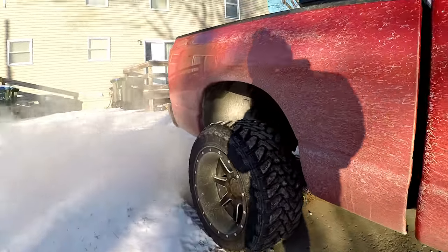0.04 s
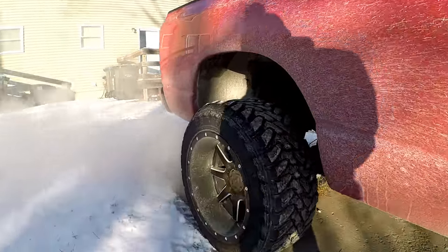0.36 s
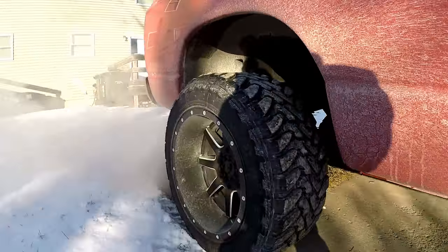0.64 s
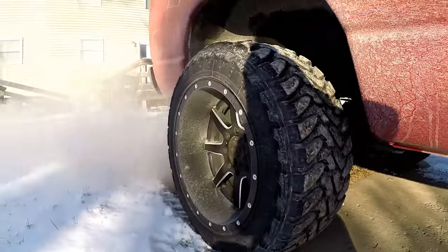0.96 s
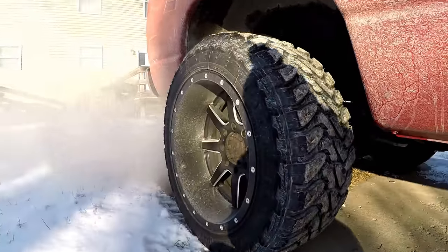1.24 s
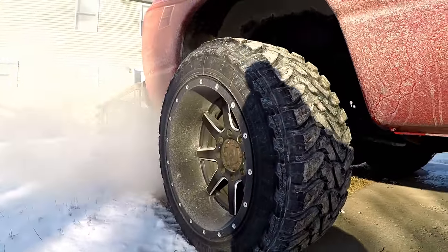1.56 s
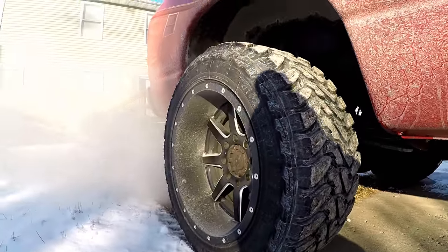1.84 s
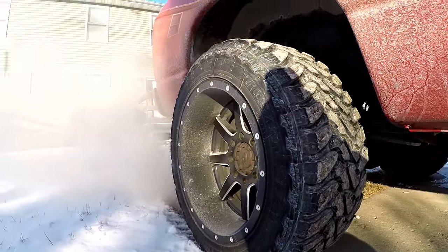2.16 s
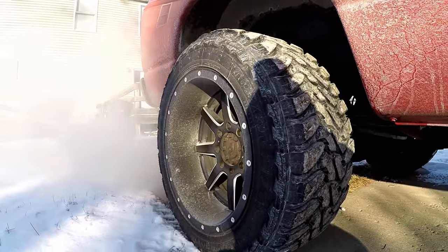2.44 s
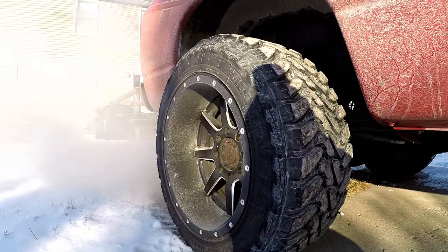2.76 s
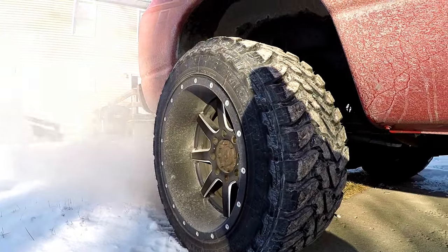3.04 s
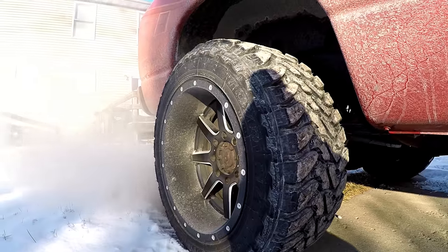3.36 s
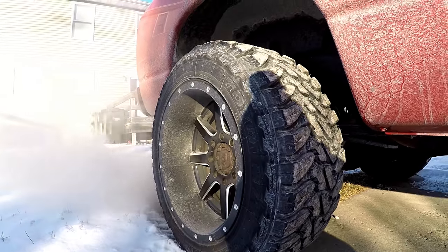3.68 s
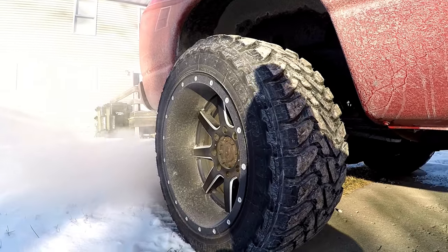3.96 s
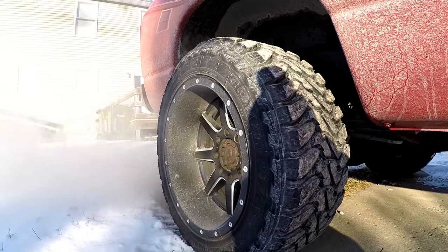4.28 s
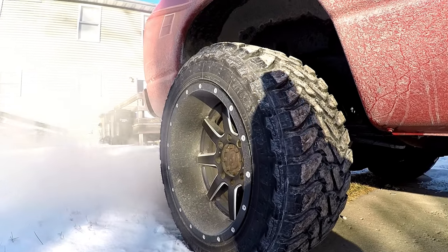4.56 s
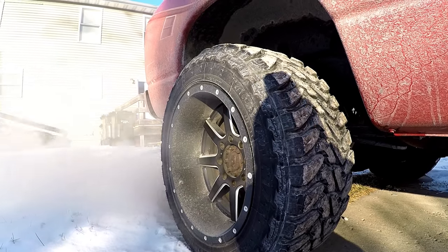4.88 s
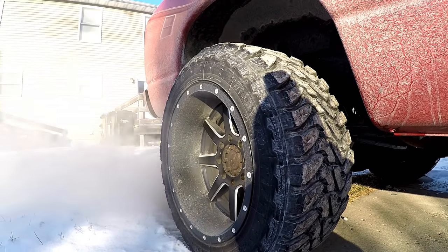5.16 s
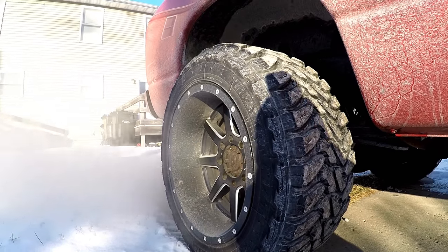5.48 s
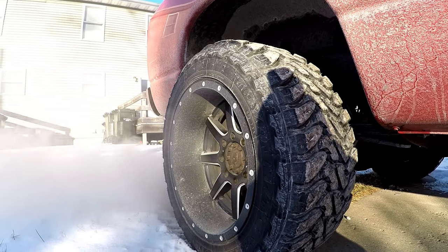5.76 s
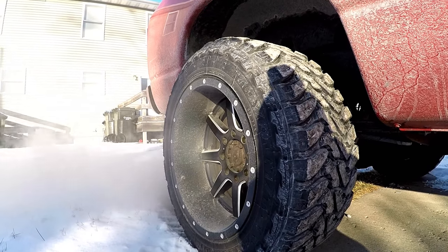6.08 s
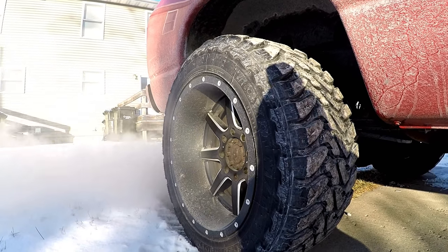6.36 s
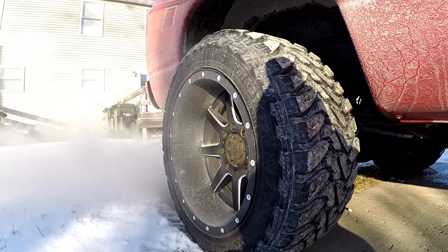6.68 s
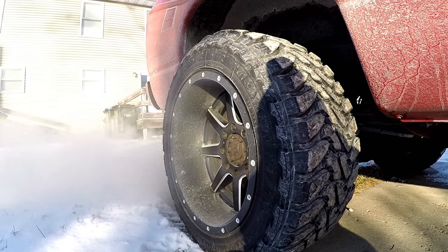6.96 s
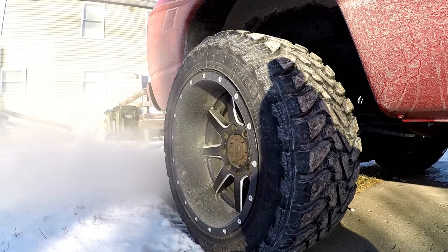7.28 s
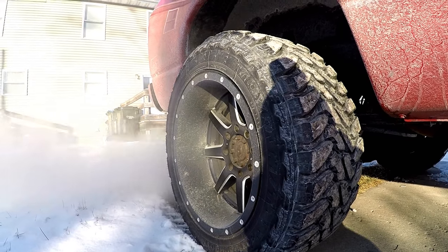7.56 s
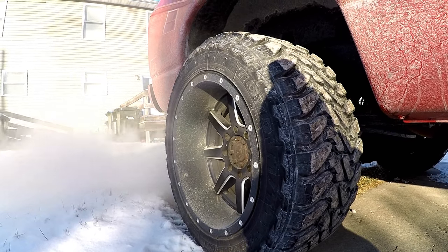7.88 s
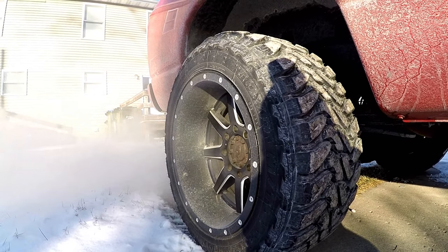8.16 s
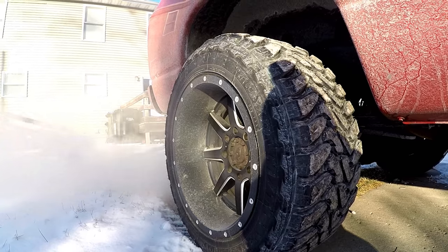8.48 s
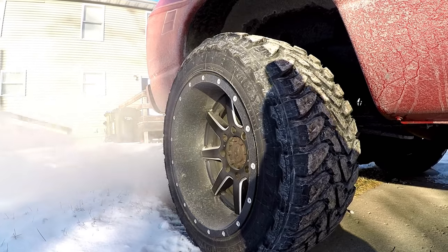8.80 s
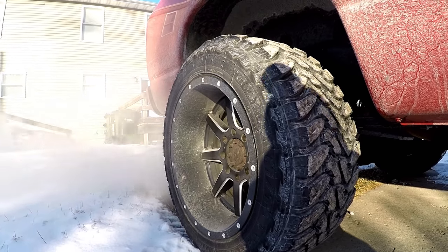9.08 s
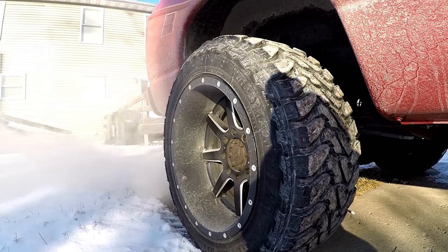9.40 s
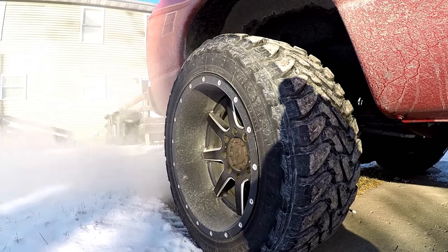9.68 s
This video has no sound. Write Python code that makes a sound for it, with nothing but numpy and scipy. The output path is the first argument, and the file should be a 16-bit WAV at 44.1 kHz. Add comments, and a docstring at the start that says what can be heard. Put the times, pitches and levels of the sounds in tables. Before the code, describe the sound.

A cold turbo diesel pickup idles close by, a deep steady exhaust drone with thuds, small coughs, engine clatter and hiss.

```python
"""A deep, steady drone with thuds, barks and rasp: a cold six-cylinder turbo diesel idling in a driveway,
heard close beside the tailpipe. Fifty firings a second drive the drone, and the uneven cylinders ring
the pipe, the hardest as coughs. Above it, ticking engine parts clatter and escaping gas hisses.
At first the tone shifts as the microphone is lowered beside the wheel, and two tiny snaps sound."""
import sys
import numpy as np
from scipy import signal
from scipy.fft import rfft, irfft
from scipy.io import wavfile
from scipy.ndimage import uniform_filter1d

SR = 44100
rng = np.random.default_rng(int(sys.argv[2]) if len(sys.argv) > 2 else 0)


def wrap_up_sound(samples):
    """Save the sound to the file named by the first command line argument, as 16-bit audio."""
    columns = np.atleast_2d(samples).T
    # keep every value between -1 and 1, then stretch to whole-number steps
    tamed = np.clip(columns, -1, 1)
    steps = np.round(tamed * 32767).astype(np.int16)
    wavfile.write(sys.argv[1], SR, steps)


N = 438354
TIME = np.arange(N) / SR
BINS = np.fft.rfftfreq(8192, 1 / SR)

# each cylinder's voice, in firing order: (thud pitch [Hz], thud level [dB], thud lag [firings], thud swell [s],
# bark level [dB], bark lag [firings], bark scatter [dB], unused level [dB], knock level [dB], knock lag
# [firings], which the rasp also reads as its gust level [dB])
CYLINDERS = [(347, 5.5, 0.202, 0.0035, -34, 0.372, 0.5, 1, -29.5, .13),
             (330, -5.5, 0.322, 0.0089, -24.5, 0.513, 2.5, 1, -30, 0.1936),
             (363, 4.5, 0.373, 0.0049, -26, 0.5106, 2.5, 0, -42.5, .2),
             (285, 3.5, 0.13, 0.0036, -24, 0.398, -0.5, 0, -30, 0.199),
             (370.3, 1.2, 0.483, 0.0047, -21, 0.5264, 3.5, 0, -34.5, .13),
             (392, 4.5, 0.296, 0.0023, -31, 0.531, 0, 0, -32.5, 0.135)]
# the drifting idle: (time [s], speed [firings/s])
IDLE = [(0.0, 50.453), (1.05, 50.014), (1.27, 50.364), (1.36, 50.052), (3.45, 50.006), (5.78, 50.085),
        (6.33, 49.755), (6.6, 50.407), (7.41, 49.794), (7.82, 49.935), (8.53, 50.25), (8.78, 49.789),
        (9.4, 50.298), (9.94, 49.783)]


def amp(db):
    """Decibels to gain."""
    return 10 ** (np.asarray(db) / 20)


def unit(x):
    """Scales to rms 1."""
    return x / np.sqrt(np.mean(x ** 2) + 1e-20)


def curves(rows):
    """Turns each column of a time table into an automation curve."""
    times, *columns = np.transpose(rows)
    return [np.interp(TIME, times, column) for column in columns]


def add(mix, time, sound):
    """Mixes a sound in, centred on a time in seconds."""
    at = round(time * SR) - len(sound) // 2 + np.arange(len(sound))
    inside = (at >= 0) & (at < N)
    mix[at[inside]] += sound[inside]


def wander(rate_hz):
    """Smooth random drift of rms 1, rolling off above the given rate."""
    hz = np.fft.rfftfreq(N, 1 / SR)
    return unit(irfft(rfft(rng.standard_normal(N)) * np.exp(-(hz / rate_hz) ** 2), N))


def resonate(x, gain):
    """Minimum-phase EQ, a gain per bin, so each resonance rings after its cause; the result has rms 1."""
    log_gain = np.log(gain + 1e-5)
    mirrored = np.r_[log_gain, log_gain[-2:0:-1]]
    taps = np.fft.ifft(np.exp(np.conj(signal.hilbert(mirrored)))).real
    return unit(signal.oaconvolve(x, taps)[:N])


def metal_colour(x, spectrum, ripple_db):
    """A broad tone curve with the metal's rings on top; ripple stands for many small, close modes."""
    # narrow rings and hollows of the metalwork: (frequency [Hz], width [Hz], lift [dB])
    rings = [(700, 22, 0), (1570, 60, -0.5), (2040, 59, -2), (2170, 44, 4.5), (2360, 38, 5),
             (2450, 37, 2.5), (2670, 29, 4), (2850, 150, -1), (3540, 31, 3.5), (3960, 80, -1.5),
             (4410, 140, 4.5), (4500, 25, 2.5), (4870, 41, 3.5), (4760, 50, 3.5), (5860, 30, 1.5)]
    points_hz, points_db = np.transpose(spectrum)
    broad_db = np.interp(np.log(BINS + 1), np.log(points_hz), points_db)
    rings_db = sum(lift * np.exp(-((BINS - hz) / width) ** 2) for hz, width, lift in rings)
    ripple = unit(uniform_filter1d(rng.standard_normal(len(BINS)), size=8))
    return resonate(x, amp(broad_db + rings_db + ripple_db * ripple))


def crank_angle(start_firings=.3845, hunt_hz=1.11, hunt_firings_per_s=.205, crest_s=-.022):
    """Crank angle in firings: the governor hunts evenly around the drifting idle speed."""
    speed = curves(IDLE)[0] + hunt_firings_per_s * np.cos(2 * np.pi * hunt_hz * (TIME - crest_s))
    return start_firings + np.cumsum(speed) / SR


def drone(crank, waver=0.046, firing_lag=0.24, bank_lag=0.5183, low_cut_lead_rad=1.54):
    """A pulse at every firing, a swing between the two manifold halves, and weak partials between."""
    # engine orders: (frequency [multiples of the six-firing cycle], level [dB])
    partials = [(3, -62), (4, -50), (5, -49), (6, -12.5), (7, -47), (9, -36), (10, -45.5), (11, -43.5),
                (12, -24.5), (13, -59.5), (14, -53), (15, -33.5), (16, -57), (18, -36.5), (20, -40.5),
                (21, -39.5), (22, -44.5), (24, -30), (25, -38), (27, -48.5), (28, -42), (29, -50.5),
                (33, -41.5), (53, -48), (54, -47), (68, -43.5), (89, -51.5), (90, -52), (95, -51),
                (113, -49.5), (116, -50), (132, -52), (134, -55.5)]
    count = len(CYLINDERS)
    out = np.zeros(N)
    unsteady = 1 + waver * wander(23)
    for (order, db), chance in zip(partials, rng.random(len(partials))):
        lag = {0: firing_lag, count // 2: bank_lag}.get(order % count, count * chance)
        # the microphone's low cut advances the firing tone
        phase = 2 * np.pi * order * (crank - lag) / count + low_cut_lead_rad * (order == count)
        out += amp(db) * np.cos(phase) * (unsteady if order > 2 * count else 1)
    return np.sqrt(2) * out


def puff(hz, swell_s, linger=1):
    """A pressure wave swells in one pipe resonance and takes linger times as long to die."""
    t = np.arange(-SR // 40, SR // 40) / SR
    envelope = np.exp(-(t / np.where(t < 0, swell_s, swell_s * linger)) ** 2)
    return -envelope * np.cos(2 * np.pi * hz * t)


def blowdowns(crank, bark_lift_db, thud_db=-28.5, thud_detune=.008, thud_jitter_s=.00005,
              echo_s=.00976, echo_gain=.3, bark_hz=557, bark_detune=.009, jitter_s=.00012,
              knock_scatter_db=2.0, cough_thud_db=2.0, crack_db=-17):
    """Each opening exhaust valve sends a knock, a thud and a bark down the pipe; hard firings cough."""
    # the hardest firings, standing out of the idle: (time [s], level [dB])
    coughs = [(0.082, -17), (0.161, -18), (0.201, -15.5), (0.32, -19), (0.4, -17.5), (0.44, -18),
              (0.52, -20), (0.559, -19), (0.64, -19), (0.679, -18), (0.919, -17), (1.159, -19.5),
              (1.278, -16.5), (1.358, -17), (1.399, -18), (1.715, -18.5), (1.878, -19), (1.995, -21),
              (2.117, -22), (2.357, -17), (2.597, -19.5), (2.716, -18), (2.836, -20), (2.957, -17.5),
              (3.077, -18.5), (3.157, -19), (3.197, -16.5), (3.275, -18.5), (3.395, -21), (3.676, -17.5),
              (4.273, -18), (4.395, -15.5), (4.996, -17.5), (5.074, -18), (5.116, -18), (5.193, -21),
              (5.594, -16.5), (5.956, -16.5), (6.275, -17), (7.03, -20.5), (7.63, -20), (7.952, -17),
              (8.073, -17.5), (8.31, -20), (8.354, -19), (8.473, -18), (8.834, -17.5), (9.272, -17.5),
              (9.312, -16.5), (9.792, -18.5)]
    cough_s, cough_db = np.transpose(coughs)
    thuds, knocks_and_barks = np.zeros((2, N))
    firings = np.arange(int(crank[-1]) + 1)
    starts = np.interp(firings, np.r_[0, crank], np.r_[-crank[0] / IDLE[0][1], TIME])
    period = np.mean(np.diff(starts))
    for firing, start, luck in zip(firings, starts, rng.standard_normal((len(starts), 8))):
        (thud_hz, size_db, thud_lag, swell_s, bark_db, bark_lag, scatter_db, _,
         knock_db, knock_lag) = CYLINDERS[firing % len(CYLINDERS)]
        hard = abs(cough_s - start - period / 2) < period / 2

        knock = amp(knock_db + knock_scatter_db * luck[6]) * puff(hz=900, swell_s=.0013)
        add(knocks_and_barks, start + knock_lag * period + jitter_s * luck[7], knock)

        thud_gain = amp(thud_db + size_db + luck[0] + cough_thud_db * hard.any())
        thud = thud_gain * puff(thud_hz * (1 + thud_detune * luck[1]), swell_s, linger=1.37)
        thud_s = start + thud_lag * period + thud_jitter_s * luck[2]
        add(thuds, thud_s, thud)
        add(thuds, thud_s + echo_s, echo_gain * thud)  # back from the far end of the pipe

        pitch = bark_hz * (1 + bark_detune * luck[3])  # the pipe's main resonance
        if hard.any():  # a cough also excites the next resonance up
            crack = amp(crack_db) * puff(hz=760, swell_s=.0041)
            bark = amp(cough_db[hard][0]) * (puff(pitch, swell_s=.0069) + crack)
        else:
            lift_db = bark_lift_db[max(int(start * SR), 0)]
            bark = amp(bark_db + scatter_db * luck[4] + lift_db) * puff(pitch, swell_s=.0067)
        add(knocks_and_barks, start + bark_lag * period + jitter_s * luck[5], bark)
    return thuds, knocks_and_barks


def pipe_notch(x, hz=616, width_hz=24):
    """The pipe cancels a narrow band just above its main resonance, hollowing out the barks."""
    return signal.lfilter(*signal.iirnotch(hz, hz / width_hz, fs=SR), x)


def rasp(crank, level_db=-32.0, locked=0.38, lag_firings=0.084, decay_firings=0.093, floor=0.83):
    """Turbulent gusts ring the pipe; the locked share of their grain repeats every engine cycle."""
    # tailpipe resonances: (frequency [Hz], half width [Hz], relative level [dB])
    pipe_modes = [(208, 22, -4), (235, 20, 3.5), (317, 22, 5), (386.7, 28, 8), (427, 25, -0.5),
                  (490, 10, 8.5), (555.7, 18.8, 8), (653.5, 28, -2.5), (736.5, 11.2, 5.5), (777, 22, 2.5),
                  (834, 15, -2), (881, 15, -2), (947, 7.9, -1.5), (971.5, 12.2, -2), (1120, 42, -8.5),
                  (1265, 8.8, -14), (1377, 24, -9), (1447, 26, -10.5)]
    orders = np.arange(2647)
    grain = irfft(np.exp(2j * np.pi * rng.random(len(orders))) * (orders >= 74))
    position = crank / len(CYLINDERS) % 1 * len(grain)
    looped = unit(np.interp(position, np.arange(len(grain)), grain))
    turbulence = np.sqrt(locked) * looped + np.sqrt(1 - locked) * rng.standard_normal(N)
    angle = crank - lag_firings
    cylinder = np.floor(angle).astype(int) % len(CYLINDERS)
    strength = amp(np.array(CYLINDERS)[cylinder, -1])  # the last column as dB: nearly even gusts
    gusts = strength * (floor + np.exp(-(angle % 1) / decay_firings))
    power = sum((amp(db) / (1 + ((BINS - hz) / width) ** 2)) ** 2 for hz, width, db in pipe_modes)
    return amp(level_db) * resonate(turbulence * gusts, np.sqrt(power))


def ground_bounce(x, delay_ms=1.89):
    """The reflection off the ground combs the sound while the microphone is high."""
    # the reflection fading as the microphone sinks: (time [s], gain [share of the direct sound])
    bounce = [(0, .55), (1, .5), (1.6, 0)]
    share = curves(bounce)[0]
    reflection = np.interp(TIME - delay_ms / 1000, TIME, x)
    return (x + share * reflection) / np.hypot(1, share)


def clatter(crank, echo_ms, level_db=-43.5, ticks_per_cycle=168, spread_db=2.0, scatter_db=3.0,
            jitter_s=.00009, rattle=0.12, rattle_decay_s=0.011, echo_gain=0.1):
    """Injectors, valves and gears tick at fixed crank angles and ring the block."""
    # two accents in each cycle: (crank angle [firings], half width [firings], lift [dB])
    swells = [(.85, 0.28, 3.5), (2.9, .24, 6)]
    # tone of the engine block: (frequency [Hz], relative level [dB])
    block_tone = [(300, -29), (700, -8), (1000, 2.5), (1300, 3.5), (1560, -0.5), (1760, 2), (2050, 0.5),
                  (2330, -2), (2700, -4), (3200, -9.5), (3900, -17.5), (4600, -18), (7000, -22.5),
                  (14000, -39)]
    cycles = np.arange(-1, crank[-1] / len(CYLINDERS))[:, None]
    pattern = (np.arange(ticks_per_cycle) + rng.random(ticks_per_cycle)) / ticks_per_cycle
    angles = len(CYLINDERS) * (cycles + pattern)
    times = np.interp(angles, crank, TIME, left=-1, right=-1)
    times += jitter_s * rng.standard_normal(angles.shape)
    polarity = rng.choice([-1, 1], ticks_per_cycle)
    tick_db = spread_db * rng.standard_normal(ticks_per_cycle)
    tick_db = tick_db + scatter_db * rng.standard_normal(angles.shape)
    in_cycle = angles % len(CYLINDERS)
    swell_db = sum(db * np.exp(-((in_cycle - angle) / width) ** 2) for angle, width, db in swells)
    size = polarity * amp(tick_db + swell_db)
    heard = (times > 0) & (times < TIME[-1])
    ticks = np.bincount((times[heard] * SR).astype(int), size[heard], N)
    # the ticks scatter under the truck, smeared in time with a flat spectrum
    t = TIME[:SR // 20]
    underbody = rattle * rng.standard_normal(len(t)) * np.exp(-t / rattle_decay_s) + (t == 0)
    underbody = irfft(np.exp(1j * np.angle(rfft(underbody))))
    block = metal_colour(signal.oaconvolve(ticks, underbody)[:N], block_tone, ripple_db=1.13)
    body_echo = np.interp(TIME - echo_ms / 1000, TIME, block)
    return amp(level_db) * unit(block + echo_gain * body_echo)


def hiss(crank, level_db=-49.0, throb=0.11, flutter_db=.5, flutter_hz=40, sway_hz=.6):
    """Gas streams from the pipe, throbbing with the firings; its colour drifts as the microphone sways."""
    # tone of the escaping gas: (frequency [Hz], relative level [dB])
    gas_tone = [(20, -7.5), (60, 9), (110, 9), (300, -0.5), (1000, 8), (2400, 3), (3200, 0.5), (3900, 1.5),
                (4500, -0.8), (5700, -1), (7000, -11), (9000, -16), (12000, -22), (15000, -26)]
    flow = (1 + throb * np.cos(2 * np.pi * crank)) * amp(flutter_db * wander(flutter_hz))
    sway = wander(sway_hz)
    gas = sum(share * metal_colour(rng.standard_normal(N), gas_tone, ripple_db=1.5)
              for share in (np.cos(sway), np.sin(sway)))
    return amp(level_db) * gas * flow


def wheel_shadow(x, mid_db, band_hz=(800, 1700), rest_follows=0.4):
    """The midrange is stronger until the wheel screens the engine; the other bands follow in part."""
    midrange = signal.sosfiltfilt(signal.butter(2, band_hz, "band", fs=SR, output="sos"), x)
    return amp(mid_db) * midrange + amp(rest_follows * mid_db) * (x - midrange)


def passing_resonances(x):
    """Resonances come and go as the microphone travels down past the bodywork."""
    # standing waves and hollows beside the truck:
    # (time [s], half length [s], frequency [Hz], width [Hz], lift [dB])
    standing_waves = [(0.11, 0.4, 290, 30, -4.5), (.5, .5, 1700, 100, 4), (0.65, 0.7, 490, 27, -6),
                      (.6, 0.61, 645, 36, 9), (.5, .55, 765, 31, -4.5), (0.82, 0.44, 880, 54, 7),
                      (0.65, 0.34, 1200, 29, 8), (0.49, 0.54, 1400, 35, -12), (.8, 0.17, 1900, 45, 8),
                      (0.89, .6, 2270, 190, -6.5), (.2, 0.56, 2890, 110, 5.5)]
    f, t, spectra = signal.stft(x, SR, nperseg=2048, noverlap=1536)
    lift_db = sum(db * np.exp(-((t - time) / length) ** 2 - ((f[:, None] - hz) / width) ** 2)
                  for time, length, hz, width, db in standing_waves)
    return signal.istft(spectra * amp(lift_db), SR, nperseg=2048, noverlap=1536)[1][:N]


def snaps(decay_s=.0008):
    """Tiny dry clicks, each a spike of bright noise."""
    # small snaps by the microphone: (time [s], peak level [dB])
    clicks = [(.312, -47), (.437, -59)]
    out = np.zeros(N)
    t = np.arange(-SR // 200, SR // 200) / SR
    for time, db in clicks:
        click = np.diff(rng.standard_normal(len(t) + 1)) * np.exp(-abs(t) / decay_s)
        add(out, time, amp(db) * click / abs(click).max())
    return out


def scene():
    """One crank angle drives every engine layer; the balance shifts with the microphone's position."""
    # the microphone's way down: (time [s], thud lift [dB], bark lift [dB],
    # midrange lift of clatter and hiss [dB], delay of the echo off the body [ms])
    approach = [(0, -12, 3, 7.5, 4), (.3, -3, -1.5, 5, 5.5), (.55, 3.5, 0.5, 4, 5.3), (.8, 2, -8, 3, 5),
                (1.05, 5, -0.5, 2.5, 4.9), (1.55, 2, -2.5, -0.5, 5.5), (2.2, 3.5, 0, 0, 5.38),
                (4.2, 2.5, -2.5, 0, 5.6), (6.3, 2.5, -0.5, 0.5, 5.8), (9.94, 2.5, -3.5, 1, 6.2)]
    thud_db, bark_db, mid_db, echo_ms = curves(approach)
    crank = crank_angle()
    thuds, knocks_and_barks = blowdowns(crank, bark_db)
    exhaust = drone(crank) + amp(thud_db) * thuds + pipe_notch(knocks_and_barks)
    exhaust += ground_bounce(rasp(crank))
    top_layer = wheel_shadow(clatter(crank, echo_ms) + hiss(crank), mid_db)
    return (passing_resonances(exhaust + top_layer) + snaps())[None]


def record(dry, fade_s=.002, cutoff_hz=15200):
    """Short fades at both ends and a steep cut of the top treble."""
    fades = np.minimum(1, np.minimum(TIME, TIME[-1] - TIME) / fade_s)
    lowpass = signal.firwin(511, cutoff_hz, window=("kaiser", 9), fs=SR)
    return signal.oaconvolve(dry * fades, lowpass[None], "same")


dry = scene()
out = record(dry)
wrap_up_sound(out)
```